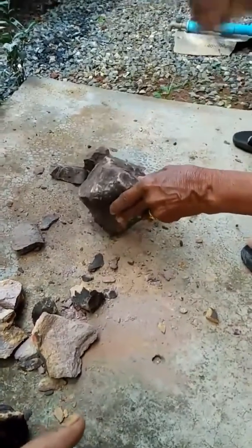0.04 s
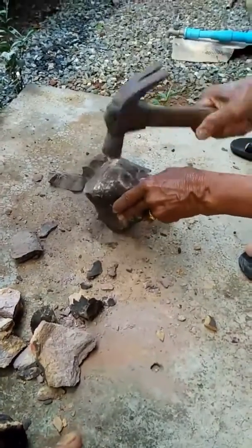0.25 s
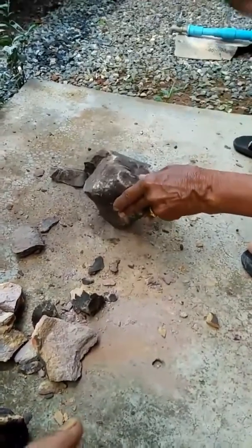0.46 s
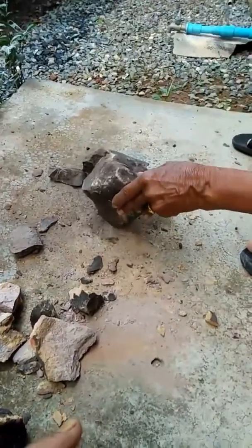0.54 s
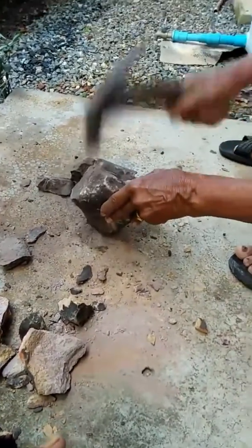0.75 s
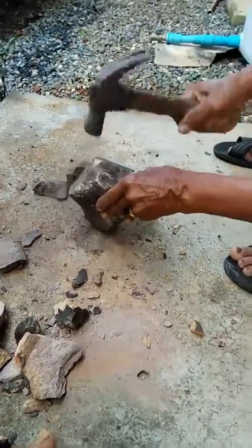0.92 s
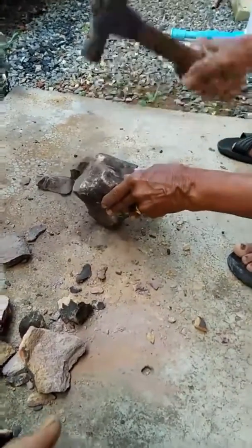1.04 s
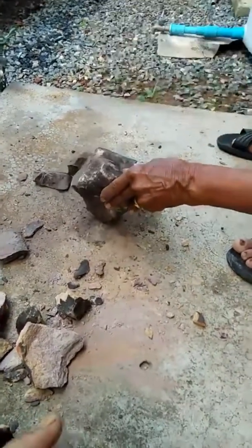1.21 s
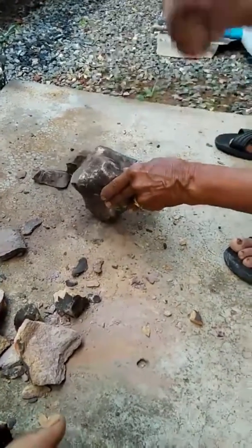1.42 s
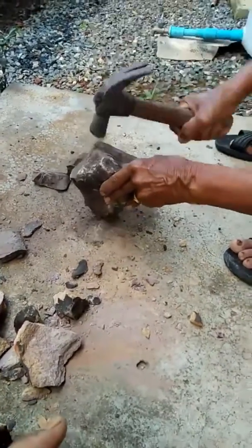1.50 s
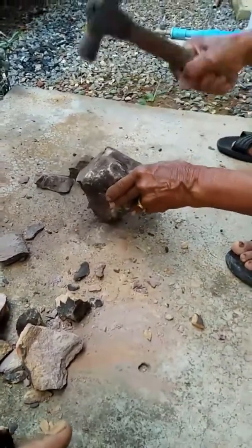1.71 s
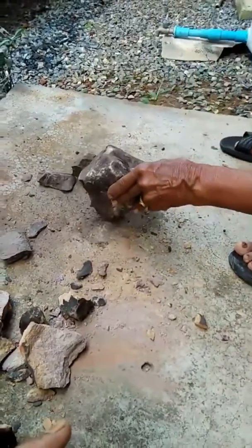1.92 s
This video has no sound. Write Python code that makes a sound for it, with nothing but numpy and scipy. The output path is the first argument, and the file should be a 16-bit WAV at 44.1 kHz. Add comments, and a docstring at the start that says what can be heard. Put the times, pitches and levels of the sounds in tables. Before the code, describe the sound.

A steel hammer strikes a rock on a concrete slab three times at a steady pace. Each blow is a sharp, gritty clack with a dull thud and a softer rebound, heard close up outdoors over faint hiss.

```python
"""Outdoors: thin high hiss, low distant hum. At 0.20 s a steel hammer strikes a hand-held rock on a
concrete slab: dull thud, 7 ms later the rock's clack with clinks and a spit of grit, then the yard's
echo and a soft rebound. The second blow falls at 0.86 s; the hum swells, the hiss fades, and a faint
whistle falls, then holds. Third blow at 1.57 s. Each blow rebounds once; a limiter squashes the peaks."""
import sys
import numpy as np
from scipy import signal
from scipy.fft import rfft, irfft
from scipy.io import wavfile
from scipy.ndimage import uniform_filter1d, minimum_filter1d

SR = 44100
rng = np.random.default_rng(int(sys.argv[2]) if len(sys.argv) > 2 else 0)


def store_wav(level_fs):
    """Save 16-bit WAV to argv[1]."""
    pcm = np.round(np.clip(np.atleast_2d(level_fs), -1, 1) * 32767)
    wavfile.write(sys.argv[1], SR, pcm.T.astype(np.int16))


N = 85995

# full blows (time [s], force [dB], contact bandwidth [Hz], grit [dB], grit tail [dB])
BLOWS = [(.2011, 0.5, 2038, -4, 2), (.8619, 0, 2100, -5.5, 3), (1.5698, -0.46, 1868, -10.5, 0)]
# hammer dropping back (time [s], thud [dB], clack [dB])
REBOUNDS = [(0.2762, -9, -19), (0.9446, -6.5, -13.5), (1.6667, -4, -9.5)]
# rock on slab (frequency [Hz], level [dB], t60 [s], rise [s])
THUD_MODES = [(149.4, -31.5, 0.045, 0.0024), (235, 0, 0.016, 0.0026), (427.4, -12, 0.045, 0.0011),
              (677, 11, 0.019, 0.0057), (1100, -11, 0.0079, .0005)]
# struck rock (frequency [Hz], level [dB], t60 [s])
ROCK_MODES = [(625.2, -10, 0.072), (749.3, -8, .05), (951, -16.5, 0.07), (1052.4, 3, 0.022),
              (1205.6, -10, 0.011), (1238, 0.5, 0.015), (1388.4, -4, 0.038), (1899, -11, .025),
              (2453, -26, .022)]
# high clinks, by spot struck (frequency [Hz], t60 [s], blow 1 [dB], blow 2 [dB], blow 3 [dB])
CLINK_MODES = [(2346, 0.075, -26, -26, -34.5), (2722, 0.029, -25.5, -38, -28),
               (2885, 0.024, -42.5, -21.5, -36), (3470, 0.023, -24.5, -23.5, -26),
               (3865, .2, -51, -41, -56.5), (3960, 0.21, -44, -40, -49), (4268, 0.022, -29, -28, -41),
               (4720, .028, -28, -39.5, -36.5), (6680, 0.027, -23.5, -37.5, -43)]
# bright spit of crushed grit, with a narrow 10 kHz notch that is not the stone's own
# (frequency [Hz], density [dB])
SPIT_SPECTRUM = [(1500, -12), (2500, 3), (4500, 7.5), (6500, -1), (8800, 5), (10200, -14.5), (11800, 3),
                 (15000, -7.5)]
# bright hissing tail of the grit, with a narrow 10 kHz notch that is not the yard's own
# (frequency [Hz], density [dB])
TAIL_SPECTRUM = [(1500, -12.5), (2800, -2.5), (4000, 5), (5500, 0.5), (9000, 4.5), (10200, -21),
                 (11500, -6), (15000, -16)]
# yard echo of the clack (frequency [Hz], density [dB])
YARD_SPECTRUM = [(40, -24.5), (140, -7.5), (215, -23.5), (330, -11), (390, -19.5), (520, -11.5),
                 (640, -3.5), (830, -11.5), (1020, -1), (1300, -6.5), (1550, -8.5), (1800, -17),
                 (2200, -20.5), (2600, -27), (5000, -47)]
# lingering yard resonances (frequency [Hz], level [dB], t60 [s])
YARD_MODES = [(633.8, -26.5, 0.18), (744.6, -26, .16), (919.4, -27, 0.16), (1007, -25.5, .18),
              (1330, -28, .14), (1625, -32.5, 0.14)]
# faint whistles (time [s], length [s], start pitch [Hz], end pitch [Hz], level [dB])
WHISTLES = [(1.003, .25, 2870, 2305, -68.5), (1.293, 0.16, 2246, 2255, -76.5)]
# distant hum (frequency [Hz], level [dB])
HUM_PARTIALS = [(48.5, -75), (145, -67.5), (193, -77.5), (290, -77.5)]
# hum swell (time [s], gain [dB])
HUM_ENVELOPE = [(0, -5.5), (.55, -5.5), (.8, 3), (1.02, 9), (1.25, 3), (1.5, 2), (1.95, 2.5)]
# high hiss (frequency [Hz], density [dB])
HISS_SPECTRUM = [(3000, -18), (6000, -16), (7500, -7), (9000, 0), (10500, -11.5), (12000, -14.5),
                 (14300, -11), (16000, -22)]
# hiss fade (time [s], level [dB])
HISS_ENVELOPE = [(0, -63), (.15, -63.5), (.38, -65), (.58, -60), (.82, -62), (1.14, -72), (1.5, -81),
                 (1.95, -77)]
# outdoor air (frequency [Hz], density [dB])
AIR_SPECTRUM = [(20, -6.5), (50, -1.5), (150, -3), (300, -8), (450, -20), (800, -25), (1500, -20.5),
                (3000, -30.5), (6000, -44), (9000, -30.5), (14000, -25)]

CLACK_LAG_S, REBOUND_LAG_S, SLAB_LAG_S = 0.0071, 0.005694, 0.003822
ECHO_RISE_S, ECHO_HOLD_S, ECHO_T60_S, LATE_T60_S = 0.013, 0.033, 0.25, 0.93


def hammer_blows(t, thud, clack, echo):
    """Steel on rock: thud first, then the clack, low-passed by the contact, with clinks and grit."""
    out = 0
    for k, (start_s, force_db, contact_hz, grit_db, tail_db) in enumerate(BLOWS):
        ring = undb(force_db) * butter(clack + echo, contact_hz, "low", order=2)
        clinks = sum(mode(t, hz, blow_db[k], t60_s) for hz, t60_s, *blow_db in CLINK_MODES)
        crack = ring + clinks + grit_spit(t, grit_db, tail_db)
        out += delay(undb(force_db) * thud + delay(crack, CLACK_LAG_S), start_s)
    return out


def hammer_rebounds(t, thud, clack, echo):
    """The hammer drops back on the same rock: softer, duller, no grit."""
    bump = butter(thud, hz=327, kind="low", order=2)
    knock = mode(t, hz=688, db=-4.5, t60_s=0.018)
    ring = knock + undb(-3) * clack + undb(-12.5) * echo
    tap = delay(butter(ring, hz=1090, kind="low", order=4), REBOUND_LAG_S)
    return sum(delay(undb(thud_db) * bump + undb(clack_db) * tap, start_s)
               for start_s, thud_db, clack_db in REBOUNDS)


def slab_thud(t):
    """Rock driven against concrete: a dull push."""
    push = -sum(mode(t, hz, db, t60_s) * rise(t, rise_s) for hz, db, t60_s, rise_s in THUD_MODES)
    push = butter(push, hz=90, kind="high", order=1)
    return butter(push, hz=1410, kind="low", order=4)


def rock_clack(t):
    """Short ring of the rock's modes."""
    return undb(2) * sum(mode(t, *row) for row in ROCK_MODES) * rise(t, tau_s=0.0006)


def grit_spit(t, grit_db, tail_db):
    """Stone crushes under the hammer face: a bright spit and a hissing tail."""
    hold_s = 0.0025
    burst = rise(t, tau_s=0.0006) * fade(t - hold_s, t60_s=0.025)
    spit = undb(grit_db - 20) * burst * wide_noise(SPIT_SPECTRUM, side_db=-14)
    tail = rise(t, ECHO_RISE_S) * (fade(t, ECHO_T60_S) + undb(-22.5) * fade(t, LATE_T60_S))
    return spit + undb(tail_db - 41) * tail * wide_noise(TAIL_SPECTRUM, side_db=-11)


def clack_echo(t, clack):
    """Slab reflection, then the yard's diffuse wash and resonances."""
    reflection = undb(-10) * delay(clack, SLAB_LAG_S)
    decay = fade(t - ECHO_HOLD_S, ECHO_T60_S) + undb(-31.5) * fade(t, LATE_T60_S)
    wash = undb(-21) * decay * noise(YARD_SPECTRUM)
    resonances = sum(mode(t, *row) for row in YARD_MODES)
    return reflection + rise(t, ECHO_RISE_S) * (wash + resonances)


def whistles(t):
    """Two faint fluttering glides, perhaps a far bird: one falling, one near level."""
    out = 0
    for start_s, length_s, from_hz, to_hz, db in WHISTLES:
        progress = np.clip((t - start_s) / length_s, 0, 1)
        glide_hz = to_hz + (from_hz - to_hz) * (1 - progress) ** 2
        pitch_hz = glide_hz * (1 + 0.025 * wander(rate_hz=200))
        swell = undb(db + 2 * wander(rate_hz=52)) * np.sin(np.pi * progress)
        out += swell * np.sin(2 * np.pi * np.cumsum(pitch_hz) / SR)
    return out


def distant_hum(t):
    """Low partials: common pitch drift, separate level waver."""
    warped_s = np.cumsum(1 + 0.025 * wander(rate_hz=28)) / SR
    hum = sum(undb(db + 3 * wander(rate_hz=60)) * np.sin(2 * np.pi * hz * warped_s)
              for hz, db in HUM_PARTIALS)
    return envelope(t, HUM_ENVELOPE) * hum


def high_hiss(t):
    """Thin noise around 9 kHz, dying away."""
    return envelope(t, HISS_ENVELOPE) * wide_noise(HISS_SPECTRUM, side_db=-13)


def outdoor_air():
    """Steady noise floor, mostly low."""
    return undb(-64.5) * noise(AIR_SPECTRUM)


def undb(db):
    """Decibels to gain."""
    return 10 ** (np.asarray(db) / 20)


def envelope(t, points):
    """Gain through (time [s], level [dB]) points."""
    return undb(np.interp(t, *np.array(points).T))


def fade(t, t60_s):
    """Exponential decay from t = 0; unity before."""
    return np.exp(-np.log(1000) * np.maximum(t, 0) / t60_s)


def rise(t, tau_s):
    """Exponential onset from t = 0."""
    return 1 - np.exp(-np.maximum(t, 0) / tau_s)


def mode(t, hz, db, t60_s):
    """One decaying resonance."""
    return undb(db) * np.sin(2 * np.pi * hz * t) * fade(t, t60_s)


def delay(x, lag_s):
    """Delay, cut to N samples."""
    silence = np.zeros(x.shape[:-1] + (int(lag_s * SR),))
    return np.concatenate([silence, x], axis=-1)[..., :N]


def butter(x, hz, kind, order):
    """Butterworth low-pass or high-pass."""
    return signal.sosfilt(signal.butter(order, hz, kind, fs=SR, output="sos"), x + 1e-18)


def noise(spectrum):
    """Unit-rms noise shaped by (frequency [Hz], density [dB]) points."""
    hz, db = np.array(spectrum).T
    bins_hz = np.maximum(np.fft.rfftfreq(N, 1 / SR), 1)
    gain = undb(np.interp(np.log(bins_hz), np.log(hz), db))
    x = irfft(rfft(rng.standard_normal(N)) * gain, N)
    return x / x.std()


def wide_noise(spectrum, side_db):
    """Mid/side stereo noise."""
    return noise(spectrum) + undb(side_db) * noise(spectrum) * np.array([[1], [-1]])


def wander(rate_hz):
    """Smoothed random steps, unit deviation."""
    hold = int(SR / rate_hz)
    steps = np.repeat(rng.standard_normal(N // hold + 1), hold)
    x = uniform_filter1d(uniform_filter1d(steps, hold), hold)[:N]
    return x / x.std()


def scene():
    """Hammering over the quiet yard."""
    t = np.arange(N) / SR
    thud, clack = slab_thud(t), rock_clack(t)
    echo = clack_echo(t, clack)
    hammer = hammer_blows(t, thud, clack, echo) + hammer_rebounds(t, thud, clack, echo)
    return hammer + whistles(t) + distant_hum(t) + high_hiss(t) + outdoor_air()


def record(dry):
    """Fast peak limiter, then a steep low-pass."""
    ceiling_db, window_s, cutoff_hz = -2.4, 0.0008, 14800
    window = int(window_s * SR)
    gain = np.minimum(1, undb(ceiling_db) / (np.abs(dry).max(axis=0) + 1e-9))
    limited = dry * uniform_filter1d(minimum_filter1d(gain, window), window)
    return signal.sosfilt(signal.ellip(8, 0.2, 70, cutoff_hz, fs=SR, output="sos"), limited)


dry = scene()
out = record(dry)
store_wav(out)
```